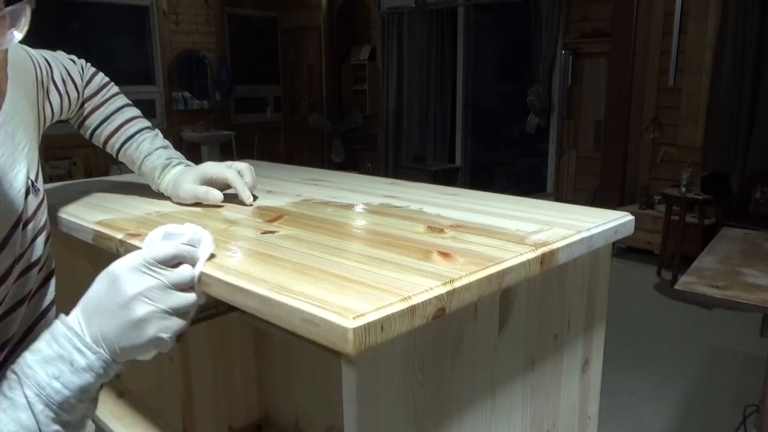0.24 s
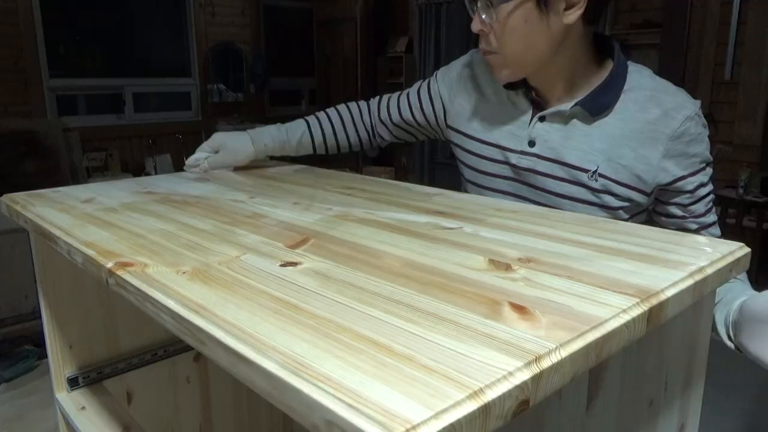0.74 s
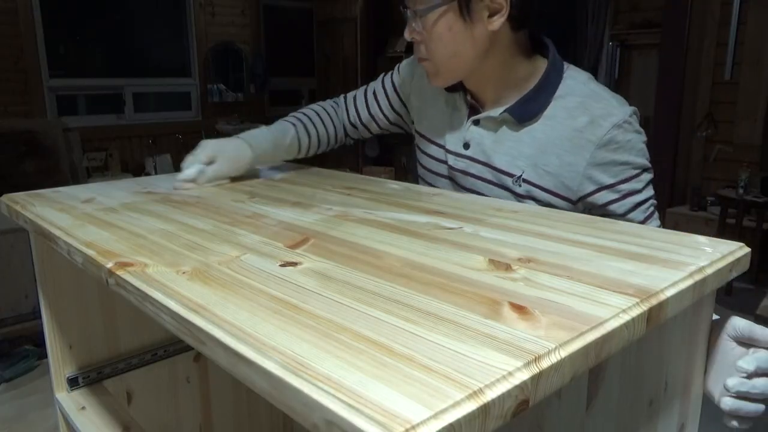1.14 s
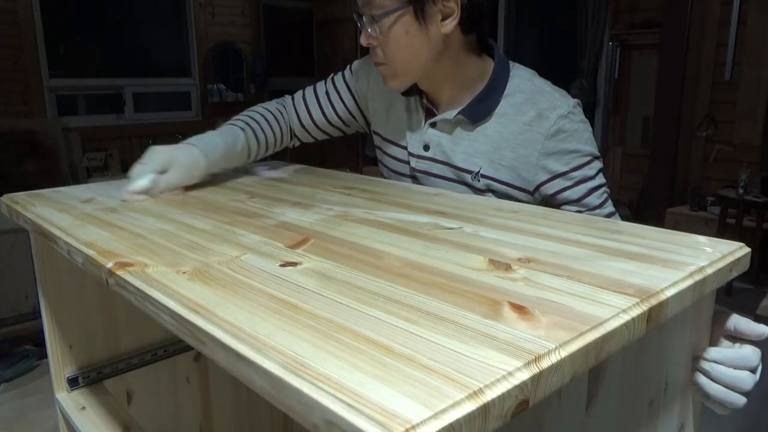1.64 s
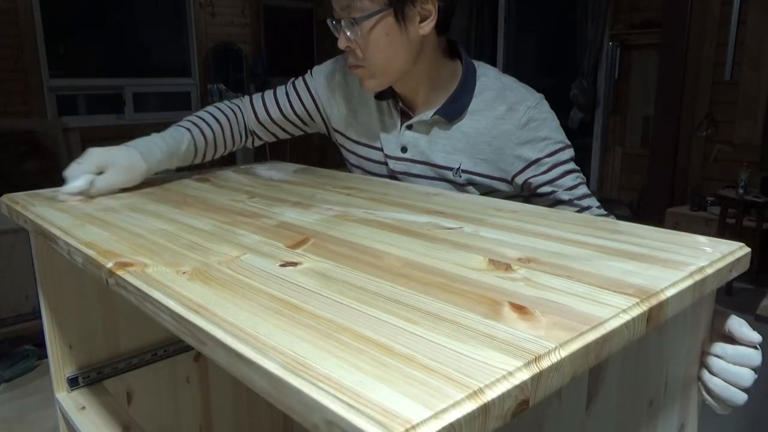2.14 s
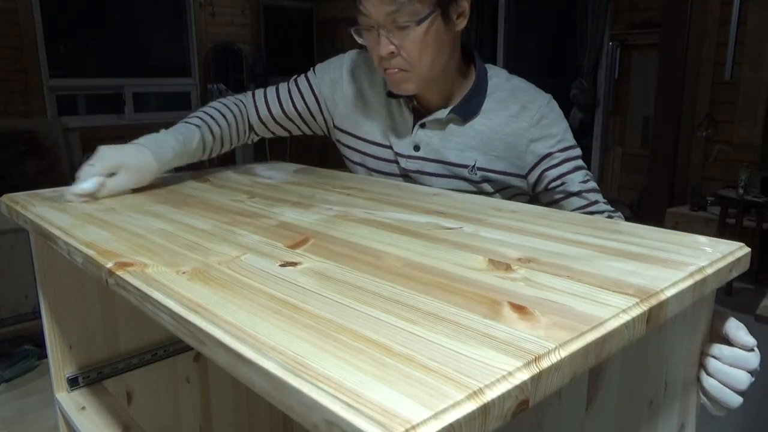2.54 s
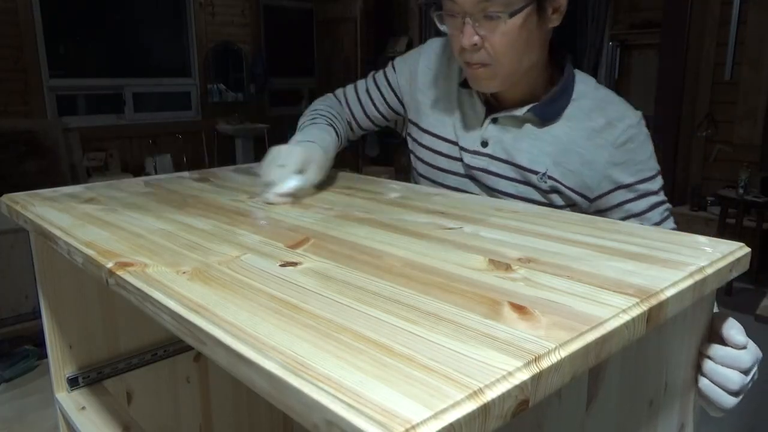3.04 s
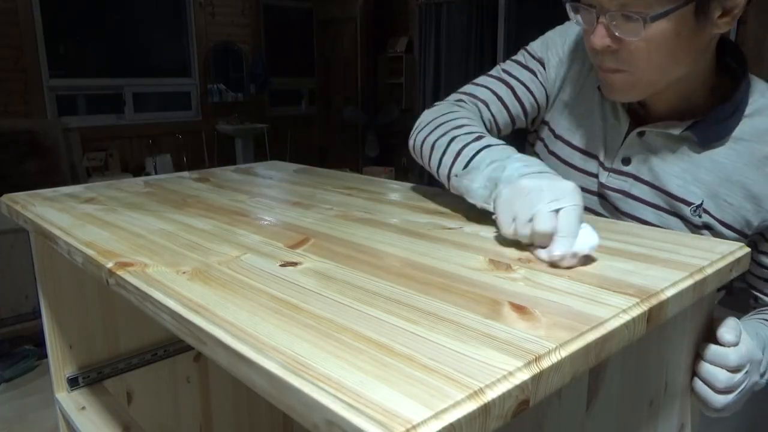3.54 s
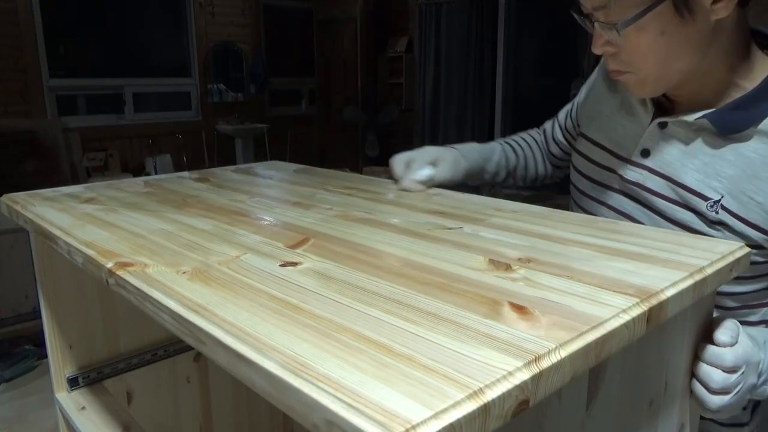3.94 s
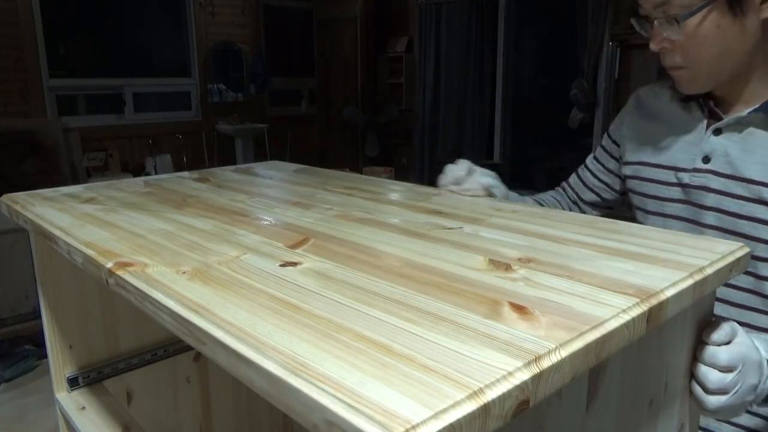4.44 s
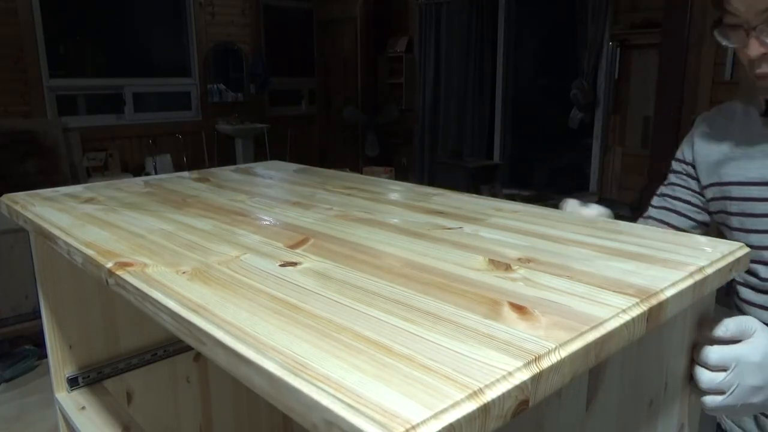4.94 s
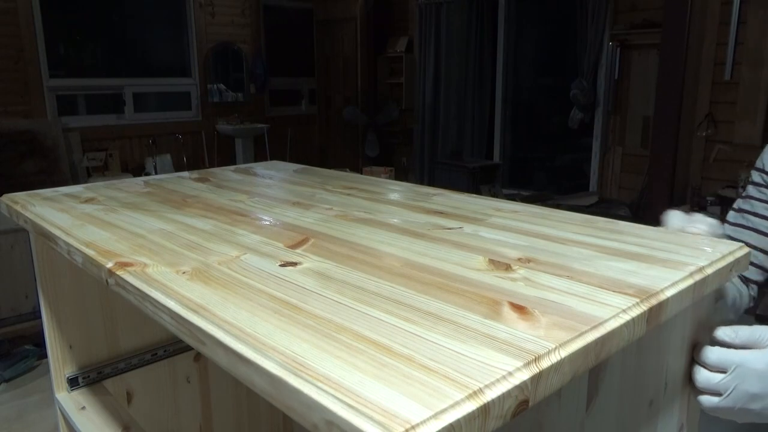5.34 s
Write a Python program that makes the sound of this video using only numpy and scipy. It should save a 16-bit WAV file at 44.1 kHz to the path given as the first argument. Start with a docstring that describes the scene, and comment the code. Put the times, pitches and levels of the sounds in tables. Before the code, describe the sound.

In a quiet wooden workshop with mains hum, a cloth rubs a cabinet top close to a small stereo microphone, about four soft hissing strokes a second. A low droning rumble enters abruptly after half a second and fades by 4.6 s. Dull hollow knocks cluster around 2.5 s, the strokes grow stronger near 3 s, strong shoe scuffs come at 3.1 and 5 s, and two knocks end it.

```python
"""Wooden workshop, small stereo microphone close to a bare pine cabinet top, still air and mains hum throughout.
From the start an oiled rag wipes to and fro: noise with tiny slips, dipping at each turn of the hand.
At 0.67 s a low rumble of noise bands and a drone sets in; soles, as gritty noise, begin to scuff the floor.
Dull knocks ring the hollow cabinet's modes, most of them near 2.5 s; strong scuffs come at 3.1 s and 5 s.
The rumble is gone by 4.6 s; two last knocks fall near 5.56 s while the rag still moves."""
import sys
import numpy as np
from scipy import signal
from scipy.io import wavfile
from scipy.ndimage import uniform_filter1d

SR = 44100
rng = np.random.default_rng(int(sys.argv[2]) if len(sys.argv) > 2 else 0)


def output_pcm(signal):
    """Save a mono or channel-first signal as 16-bit PCM at the path in sys.argv[1].

    Samples are clipped to [-1, 1] before scaling.
    """
    pcm = np.clip(np.atleast_2d(signal).T, -1, 1) * 32767
    wavfile.write(sys.argv[1], SR, np.round(pcm).astype(np.int16))


def to_linear_factor(level_db):
    """Convert decibel levels (scalar or array-like) to linear amplitude factors."""
    exponent = np.asarray(level_db, float) / 20
    return 10 ** exponent


N = 246519

# Spectrum of the still air: f/Hz, relative density/dB per Hz
AIR_SPECTRUM = [(12, -35), (20, 7), (59, 3), (133, 1.5), (181, 4), (326, -2), (1020, 0), (1950, -6.5),
                (2650, -3), (3700, -9), (6840, -11), (10400, -11), (15800, -26)]
# Mains hum partials: f/Hz, mean level/dB rms
HUM_PARTIALS = [(60, -47.5), (120, -65), (180, -54.5)]
# Course of the rumble: t/s, low roll level/dB, roar level/dB, mean drone f/Hz, mean drone level/dB
RUMBLE_COURSE = [(.66, -38.5, -35, 204, -39), (.95, -38, -31, 206, -41), (1.02, -38.5, -35, 208, -64),
                 (1.16, -35.5, -34, 207.5, -43), (1.55, -41.5, -38.5, 207, -44.5),
                 (1.86, -46, -38.5, 204, -43.5), (2.06, -38.5, -34, 192, -45.5),
                 (2.28, -42, -38, 193.4, -41.5), (2.45, -32.5, -37, 194, -42),
                 (2.77, -42.5, -39, 203, -37.5), (3.05, -41.5, -39.5, 195, -53),
                 (3.21, -41, -46, 196, -46.5), (3.63, -48, -40.5, 203.4, -47.5),
                 (4.0, -47.5, -47, 203.3, -68), (4.31, -58, -68, 201, -64), (4.345, -38, -65, 202.6, -43),
                 (4.5, -58, -80, 201, -55)]
# Spectrum of the low roll: f/Hz, relative density/dB per Hz
ROLL_SPECTRUM = [(24, -38), (40, -2.5), (54, -4.5), (130, -5.5), (200, -1.5), (314, -4.5), (402, -10.5),
                 (457, -17), (520, -24), (680, -23), (1140, -120)]
# Spectrum of the roar above it: f/Hz, relative density/dB per Hz
ROAR_SPECTRUM = [(210, -21), (350, -13.5), (421, -1), (572, -8.5), (849, -1), (1250, -3.5), (1340, -6),
                 (2400, -16), (3120, -39), (5280, -120)]
# Side below mid for sound from the room: f/Hz, level/dB
ROOM_WIDTH = [(60, -46), (110, -28), (200, -21.5), (380, -13), (700, -11.5), (1290, -8.5), (2380, -11),
              (4400, -4), (8120, -5), (15000, -17)]
# Decay of the workshop's reverberation: f/Hz, t60/s
ROOM_DECAY = [(100, 0.18), (1000, 0.37), (3000, 0.1), (9000, 0.21)]
# Foot scuffs: start t/s, swell/s, peak level/dB, fade/dB per s, dullness 0-1
FOOT_SCUFFS = [(0.669, 0.017, -33, 40, 0.98), (.84, 0.028, -35, 70, .75), (1.925, 0.012, -31.5, 250, 0.92),
               (1.965, 0.036, -31, 120, 0.86), (2.0, 0.061, -25, 155, 0.89), (3.084, 0.048, -19.5, 62, 0.4),
               (3.13, 0.054, -17.5, 95, 0.43), (3.35, .12, -58, 14, .2), (4.31, 0.028, -36, 120, 0.78),
               (4.47, 0.064, -36, 200, .4), (4.997, 0.018, -20.5, 250, 0.33), (5.02, 0.021, -23, 103, 0.57),
               (5.46, 0.018, -34, 157, 0.03), (5.475, 0.019, -36, 700, .03)]
# Spectrum of a sharp scuff: f/Hz, relative density/dB per Hz
SHARP_SOLE = [(210, -25), (350, -11), (617, -35), (706, -8), (1010, 5.5), (1140, 4), (1270, 5.5),
              (2290, 8.5), (3000, 3.5), (5000, -6), (6500, -44), (11000, -120)]
# Spectrum of a flat, dull foot: f/Hz, relative density/dB per Hz
DULL_SOLE = [(250, -37), (440, -11), (580, 2.5), (820, -1), (1050, -18), (1400, -18.5), (2500, -21),
             (4500, -42)]
# Floor board resonances: f/Hz, width/Hz, boost/dB
BOARD_RESONANCES = [(810, 320, 3.5), (960, 80, 0.5), (1184, 16, 8), (1115, 14, 10), (1377, 23, 9),
                    (1500, 20, 6), (1750, 60, 4.5), (1770, 14, 6), (1900, 16, 4), (2160, 12, 5),
                    (2370, 17, -3), (3100, 100, 1.5)]
# Knocks on the cabinet: t/s, blow level/dB, contact scale/ms, boost of the deepest modes/dB
CABINET_KNOCKS = [(.682, -27.5, 2.1, -8), (2.376, -22, 3.3, -25), (2.383, -33, 1.6, -8),
                  (2.427, -23, 0.99, -6), (2.481, -25, 1.1, -4), (2.505, -25, 1.9, -1),
                  (2.525, -31.5, 1.4, -14), (2.577, -33, 2.6, 2), (4.329, -37, 0.89, 0),
                  (4.398, -38, 1.9, 4), (4.963, -32, 1.6, -9), (5.553, -23, 0.43, -11),
                  (5.569, -30, .5, -23)]
# Modes of the hollow cabinet: f/Hz, relative level/dB, t60/s
CABINET_MODES = [(58, 17, 0.11), (115.6, 6.5, 0.53), (239, -11.5, 0.29), (226, 3, 0.17), (303, 5, 0.103),
                 (345.6, 3, 0.26), (532, 9, 0.056), (686, 0, 0.27), (1070, -22, .04)]
# Small dry ticks: t/s, starting peak level/dB, f/Hz
DRY_TICKS = [(2.062, -15.5, 870), (2.063, -13, 5500), (2.401, -16.5, 1146), (3.273, -11, 5870),
             (3.939, -12, 5130)]
# Spectrum of the rag heard from ahead: f/Hz, relative density/dB per Hz
RAG_SPECTRUM = [(700, -30), (1200, -16), (2270, -14.5), (3760, -7), (5610, -1.5), (7500, 1), (9300, 0),
                (11000, -7), (13700, -16), (15800, -21.5)]
# Diffuse side below mid for a rag straight ahead: f/Hz, level/dB
RAG_WIDTH = [(700, -6), (1500, -12.5), (2500, -18), (4500, -50), (8000, -28), (11000, -24), (13000, -36),
             (15000, -10)]
# How much direction the capsules hear, as side over mid for a source fully aside: f/Hz, level/dB
CAPSULE_DIRECTION = [(1500, -16), (3500, -31), (5500, -16), (8000, -8.5), (10500, -17), (13000, -23),
                     (16000, -13)]
# Colour of the capsule pair for a source fully aside: f/Hz, gain/dB
CAPSULE_COLOUR = [(3000, 2), (6500, 0.5), (8300, -6), (10000, -2.5), (12000, 2), (15000, -1)]
# Path of the hand: t/s, place (1 left, 0 ahead, -1 right)
HAND_PATH = [(0, 0.64), (.6, 0.46), (.7, .8), (1.5, .8), (2.1, 0.69), (2.7, 1), (2.88, 0.25), (3.05, 0.26),
             (3.3, 1), (3.48, 0.34), (3.65, -0.21), (3.85, 0.41), (4.1, 0.17), (4.5, 0.24), (4.6, -0.1),
             (5.1, -0.12), (5.59, -0.25)]
# Turns of the hand: t/s, dip/dB, pause/ms
HAND_TURNS = [(.028, 14, 16), (.297, 11, 13), (.55, 16, 12.4), (0.807, 10.5, 18), (1.076, 11, 10),
              (1.333, 6.5, 16), (1.589, 11, 8.6), (1.843, 8, 20), (1.985, 0.5, 24), (2.179, 7.5, 22),
              (2.35, 11, 12), (2.56, 12, 18), (2.953, 6, 14), (3.296, 8, 16), (3.6, 0, 17), (3.92, 1.5, 39),
              (4.197, 16, 6.4), (4.44, 14, 17), (4.719, 12, 21), (4.949, 12, 27), (5.183, 10, 29),
              (5.345, 11, 10), (5.527, 12, 24)]
# Stroke after each turn: loudest level/dB, its place in the stroke 0-1, extra treble/dB, extra dull rub/dB
HAND_STROKES = [(-29.5, 0.35, 1, 12), (-28.5, 0.57, 1, 10.5), (-29.5, 0.48, 3.5, 9.5),
                (-26, 0.61, -1.5, 5.5), (-28.5, 0.37, -1, 1.5), (-26.5, 0.68, -1.5, 4.5),
                (-27, 0.53, -2.5, 1.5), (-28.5, 0.6, -2, 2.5), (-27.5, 0.37, -2.5, 4), (-29.5, 0.3, 1, 5),
                (-30, 0.13, -1, 6), (-25.5, 0.91, 3, 5), (-24, 0.29, -2, 2), (-23, 0.75, 5, 7.5),
                (-22.5, 0.16, 2.5, 3.5), (-26.5, 0.62, -1.5, 1), (-28, 0.44, 0.5, 2.5),
                (-26, 0.62, -0.5, 2.5), (-29, 0.5, -4, 4.5), (-28, 0.43, -4.5, 1), (-31.5, 0.36, -5.5, 8),
                (-30, 0.5, -5, 3), (-29.5, 0.4, -10, 9)]
# Moments when the hand bears down: t/s, gain/dB, half width/ms
HAND_PRESSES = [(.07, 4.5, 16), (2.895, 6, 55), (3.01, 3.5, 35), (3.52, 3, 41), (3.75, 2.5, 34)]


def evened(x):
    """Scales to rms 1."""
    return x / np.sqrt(np.mean(x ** 2) + 1e-20)


def read(points, hz):
    """Reads a spectrum on a log frequency axis."""
    f, value = np.transpose(points)
    return np.interp(np.log(hz + 1), np.log(f + 1), value)


def columns(rows, t):
    """Reads every column of a curve at the times t."""
    s, *rest = np.transpose(rows)
    return [np.interp(t, s, column) for column in rest]


def slow_waver(size):
    """Random drift of rms 1: noise averaged twice over size samples."""
    once = uniform_filter1d(rng.standard_normal(N), size=size)
    return evened(uniform_filter1d(once, size=size))


def grit(per_s, spread_db, smooth):
    """Mid and side excitation: tiny slips of uneven size in smooth noise."""
    size_db = spread_db * np.minimum(rng.exponential(1, (2, N)), 3)
    slips = (rng.random((2, N)) < per_s / SR) * to_linear_factor(size_db)
    signed = slips * rng.choice([-1., 1.], (2, N))
    return evened(signed) + smooth * rng.standard_normal((2, N))


def coloured(drive, shape_db, width, patchy_db, size, lean=lambda hz, t: 0):
    """Gives mid and side a moving, patchy spectrum shape_db(hz, t) of about unit mid power."""
    overlap = size * 3 // 4
    hz, t, z = signal.stft(evened(drive), SR, nperseg=size, noverlap=overlap)
    patches = rng.standard_normal((len(t), len(hz))).T
    patches = uniform_filter1d(patches, size=size // 80, axis=0)
    patches = evened(uniform_filter1d(patches, size=12000 // size, axis=1))
    gain = to_linear_factor(shape_db(hz[:, None], t) + 0 * t)
    gain *= to_linear_factor(patchy_db * patches) / np.sqrt(np.mean(gain ** 2, axis=0))
    z *= gain
    aside = lean(hz[:, None], t)
    diffuse = to_linear_factor(read(width, hz))[:, None] + 1.47 * abs(aside)  # a source aside also sounds wider
    z[1] = z[1] * diffuse + aside * z[0]
    return signal.istft(z, SR, nperseg=size, noverlap=overlap)[1][:, :N]


def left_right(mid_side):
    """Mid and side to the two channels."""
    mid, side = mid_side
    return np.array([mid + side, mid - side])


def air():
    """Still workshop air as shaped noise, and mains hum as sines of wavering level."""
    noise = rng.standard_normal((2, N))
    out = to_linear_factor(-37.5) * coloured(noise, lambda f, s: read(AIR_SPECTRUM, f), ROOM_WIDTH, patchy_db=1.5, size=2048)
    t = np.arange(N) / SR
    for hz, db in HUM_PARTIALS:
        level = to_linear_factor(db + 2.1 * slow_waver(5000))
        out[0] += level * np.sqrt(2) * np.sin(2 * np.pi * (hz * t + rng.random()))
    return out


def rumble():
    """A low roll of noise with a gritty roar above it and a drone wavering in pitch and level."""
    t = np.arange(N) / SR
    low_db, roar_db, hz, drone_db = columns(RUMBLE_COURSE, t)
    sets_in = np.clip((t - .665) / 0.0097, 0, 1)
    dies_out = np.clip((4.6 - t) / 0.31, 0, 1)
    noise = rng.standard_normal((2, N))
    low = coloured(noise, lambda f, s: read(ROLL_SPECTRUM, f), ROOM_WIDTH, patchy_db=1.0, size=2048)
    rough = grit(per_s=550, spread_db=-2.0, smooth=1.83)
    roar = coloured(rough, lambda f, s: read(ROAR_SPECTRUM, f), ROOM_WIDTH, patchy_db=0.5, size=1024)
    wobble = slow_waver(1500)
    pitch = hz + 3.9 * np.roll(wobble, N // 2)  # Hz; shifted so pitch and level drift apart
    drone = np.sqrt(2) * np.sin(2 * np.pi * np.cumsum(pitch) / SR)
    out = to_linear_factor(low_db) * low + to_linear_factor(roar_db) * roar
    out[0] += to_linear_factor(drone_db + 2.1 * wobble) * drone
    return out * sets_in * dies_out


def shop(x):
    """Room tail in mid and side: sparse random taps, each band dying at its own speed."""
    sparse = rng.choice([-1., 1.], (2, SR)) * (rng.random((2, SR)) < .05)
    taps = sparse * (np.arange(SR) > 300)  # no echo in the first 7 ms
    hz, t, z = signal.stft(taps, SR, nperseg=512)
    z *= to_linear_factor(-60 * t / read(ROOM_DECAY, hz)[:, None])
    z[1] *= to_linear_factor(read(ROOM_WIDTH, hz) - 4.0)[:, None]
    tail = signal.istft(z, SR, nperseg=512)[1]
    return signal.fftconvolve(x[None], tail / np.linalg.norm(tail[0]), axes=1)[:, :N]


def scuffs():
    """Gritty soles drag over boards that ring a little; a flat foot sounds duller."""
    t, power, dull = np.arange(N) / SR, np.full(N, 1e-16), np.zeros(N)
    for s, swell, db, fade_db, dullness in FOOT_SCUFFS:
        rise = np.clip((t - s) / swell, 0, 1) ** 1.25
        weight = rise * to_linear_factor(db - fade_db * np.maximum(t - s - swell, 0))
        power += weight ** 2
        dull += dullness * weight ** 2
    frame_power, frame_dull = uniform_filter1d([power, dull], size=2048)
    dull_share = frame_dull / np.maximum(frame_power, 1e-16)

    def shape_db(hz, frame_s):
        share = np.clip(np.interp(frame_s, t, dull_share), 0, 1)
        rings = sum(db / (1 + (2 * (hz - f) / w) ** 2) for f, w, db in BOARD_RESONANCES)
        blend = (1 - share) * to_linear_factor(read(SHARP_SOLE, hz)) + share * to_linear_factor(read(DULL_SOLE, hz))
        return 20 * np.log10(blend) + rings

    drive = grit(per_s=2000, spread_db=2.5, smooth=1.2)
    return np.sqrt(power) * coloured(drive, shape_db, ROOM_WIDTH, patchy_db=2, size=2048)


def knocks():
    """Soft pushes excite the hollow cabinet's decaying modes; a few dry ticks are short decaying sines."""
    out, t = np.zeros(N + SR), np.arange(SR // 3) / SR
    late = rng.uniform(-1, 1, (len(CABINET_KNOCKS), len(CABINET_MODES)))
    for (s, db, ms, boom_db), lags in zip(CABINET_KNOCKS, late):
        ring = np.zeros(len(t))
        for (hz, mode_db, t60), lag in zip(CABINET_MODES, lags):
            u = np.maximum(t - 0.002 * abs(lag), 0)  # each mode answers up to 2 ms late, in or out
            mode_level = to_linear_factor(mode_db + boom_db * (hz < 150) - 60 * u / t60)
            ring += np.sign(lag) * mode_level * np.sin(2 * np.pi * hz * u)
        u = t[:600] * 1000 / max(ms, .2)
        push = u * np.exp(-5.5 * u)  # a longer contact mutes the upper modes
        blow = signal.fftconvolve(ring, push)[:len(t)]
        out[round(s * SR):][:len(t)] += to_linear_factor(db) * blow / np.sqrt(2 * np.mean(blow[:900] ** 2))
    # the knocks carry almost nothing below 50 Hz
    out = signal.sosfilt(signal.butter(2, 50, "high", fs=SR, output="sos"), out)
    for s, db, hz in DRY_TICKS:
        fading = to_linear_factor(db - 60 * t * hz / 22)  # 60 dB down after 22 cycles
        out[round(s * SR):][:len(t)] += fading * np.sin(2 * np.pi * hz * t)
    return out[:N]


def stroke_controls():
    """Level, treble and rub of the rag in dB: a tent in each stroke, a dip at each turn, a few presses."""
    gain_db_per_s, loss_db_per_s = 22.5, 32  # up to the loudest place in a stroke and down after it
    fade_treble, press_treble = 0.34, 0.54  # treble lost, dB per dB of tent fall and of press
    slowing, speeding = 0.98, 0.96  # half widths of the dip before and after a turn, in pauses
    blend_s = 0.036  # one stroke eases into the next
    t = np.arange(N) / SR
    turn = np.transpose(HAND_TURNS)[0]
    top_db, place, treble_db, rub_db = np.transpose(HAND_STROKES)
    top_s = turn + np.clip(place, 0, 1) * np.diff(turn, append=N / SR)
    k = np.maximum(np.searchsorted(turn, t) - 1, 0)  # stroke under way
    late = t - top_s[k]
    fall_db = np.where(late < 0, -gain_db_per_s, loss_db_per_s) * late
    tent = [top_db[k] - fall_db, treble_db[k] - fade_treble * fall_db, rub_db[k]]
    level, treble, rub = uniform_filter1d(tent, round(blend_s * SR))
    dips = sum(db * .5 ** (((t - s) * 1000 / ms / np.where(t < s, slowing, speeding)) ** 2)
               for s, db, ms in HAND_TURNS)
    press = sum(db * .5 ** (((t - s) * 1000 / ms) ** 2) for s, db, ms in HAND_PRESSES)
    return level - dips + press, treble - dips - press_treble * press, rub - press


def wipe():
    """Cloth fibres slip over the grain: a fine hiss that dips at the turns of the hand."""
    level_db, treble_db, rub_db = stroke_controls()

    def shape_db(hz, t):
        at = np.minimum(t * SR, N - 1).astype(int)
        top = 1 / (1 + (9000 / (hz + 1)) ** 6)
        under = 1 / (1 + (hz / 3800) ** 6)
        off_axis = abs(columns(HAND_PATH, t)[0]) * read(CAPSULE_COLOUR, hz)
        return read(RAG_SPECTRUM, hz) + treble_db[at] * top + rub_db[at] * under + off_axis

    def lean(hz, t):
        # a source off the axis is louder at one capsule; the side's phase shifts with frequency
        phase = 0.56 * np.log2(8500 / (hz + 1)).clip(-.6, .6)
        return columns(HAND_PATH, t)[0] * to_linear_factor(read(CAPSULE_DIRECTION, hz)) * np.exp(1j * phase)

    drive = grit(per_s=6000, spread_db=2.5, smooth=1.6)
    return to_linear_factor(level_db) * coloured(drive, shape_db, RAG_WIDTH, patchy_db=1, size=256, lean=lean)


def scene():
    """Air and rumble, then scuffs, knocks and the near rag with their room tail; the knocks sit in the centre."""
    background = air() + rumble()
    feet, blows, rag = scuffs(), knocks(), wipe()
    wet = shop(to_linear_factor(-17.0) * rag[0] + to_linear_factor(-7.5) * feet[0] + to_linear_factor(-4.0) * blows)
    return blows + left_right(rag + feet + wet + background)


def band_limit(x):
    """A steep low-pass at the top of the band."""
    return signal.sosfilt(signal.butter(12, 15950, fs=SR, output="sos"), x)


def record(dry):
    """Takes down the finished stereo mix."""
    return band_limit(dry)


dry = scene()
out = record(dry)
output_pcm(out)
```